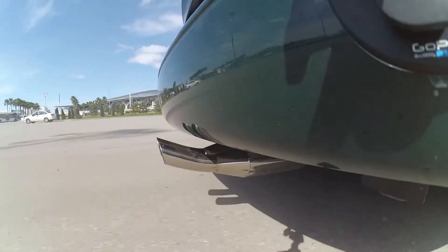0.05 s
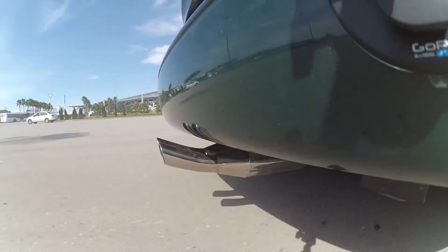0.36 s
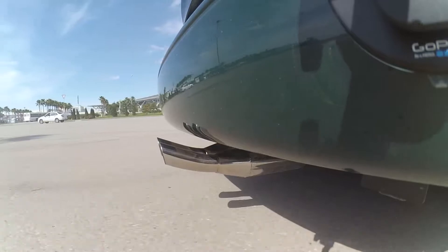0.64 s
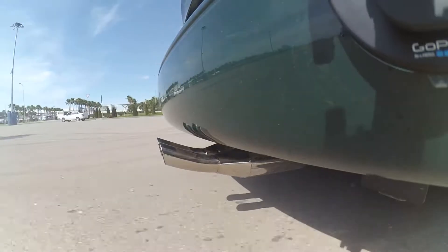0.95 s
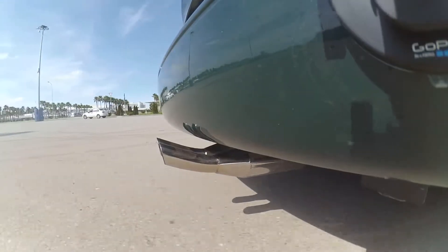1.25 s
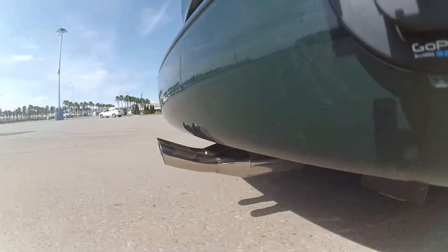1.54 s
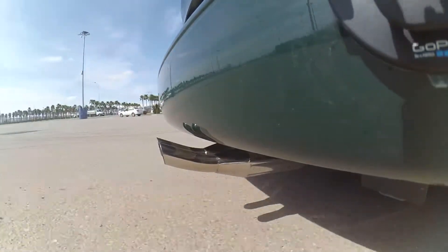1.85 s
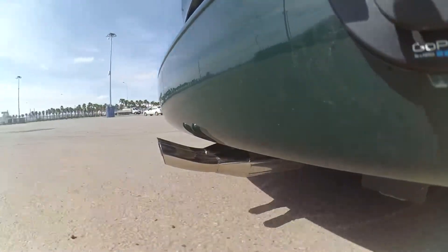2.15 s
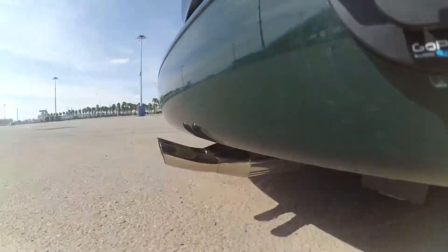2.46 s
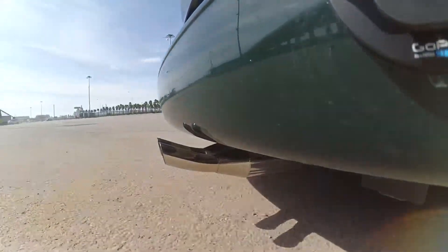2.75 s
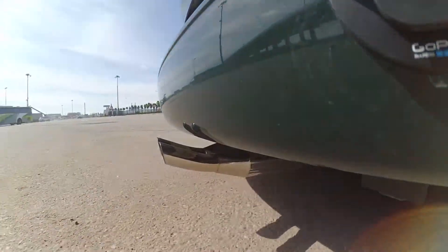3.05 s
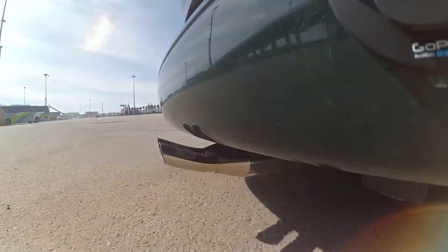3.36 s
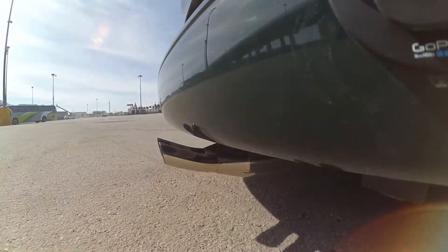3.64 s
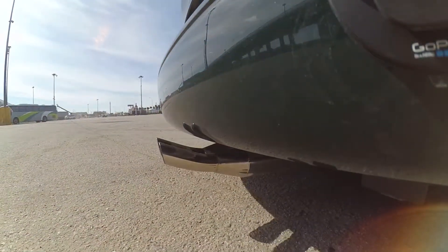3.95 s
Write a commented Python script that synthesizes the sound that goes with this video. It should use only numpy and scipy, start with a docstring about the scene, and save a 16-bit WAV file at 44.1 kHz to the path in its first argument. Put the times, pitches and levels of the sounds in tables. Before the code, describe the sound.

Heard beside the tailpipe, a car exhaust drops in pitch and settles into a steady throb. Tyres roll over gritty pavement with small stone ticks, while wind gusts thump the microphone harder later on, joined by brief, light scrubbing.

```python
"""A car coasting across a paved lot

Heard from the rear bumper, beside the tailpipe. Each engine firing makes a pressure pulse, and the
pulses slow to a low throb. The tyres roar, hiss over grit and flick small stones. Gusts buffet the
microphone, and near the end something, probably a tyre, scrubs in short judders."""
import sys
import numpy as np
from scipy import signal
from scipy.fft import rfft, irfft
from scipy.io import wavfile
from scipy.ndimage import uniform_filter1d

SR = 44100
rng = np.random.default_rng(int(sys.argv[2]) if len(sys.argv) > 2 else 0)


def wrap_up_sound(samples):
    """Save the sound to the file named by the first command line argument, as 16-bit audio."""
    columns = np.atleast_2d(samples).T
    # keep every value between -1 and 1, then stretch to whole-number steps
    tamed = np.clip(columns, -1, 1)
    steps = np.round(tamed * 32767).astype(np.int16)
    wavfile.write(sys.argv[1], SR, steps)


N = 176400
TIME = np.arange(N) / SR
BURST_AGE = np.arange(SR // 10) / SR  # seconds since a short sound began

# How fast the engine fires: (time [s], firings [1/s])
FIRING_RATE = [(0, 46.23), (.25, 42.66), (.5, 38.16), (.75, 35.18), (1, 32.75), (1.3, 31.69), (1.6, 31.47),
               (2, 30.57), (2.4, 30.15), (2.7, 29.49), (2.9, 31.04), (3.1, 31.19), (3.4, 32.3),
               (3.7, 31.72), (4, 33.37)]
# Exhaust tones at 1 to 6 times the firing rate: (time [s], tone 1 [dB], ..., tone 6 [dB])
EXHAUST_TONES = [(0, -11.5, -25.5, -23.5, -24.5, -49, -50), (.4, -16.5, -23.5, -25.5, -26.5, -37.5, -47),
                 (.75, -15.5, -20, -28.5, -35.5, -34.5, -78), (1.2, -15, -16, -30, -31, -31, -32),
                 (1.5, -14.5, -16.5, -44, -34, -33, -36.5), (2.3, -15, -17.5, -45, -36, -28.5, -32.5),
                 (2.85, -15, -18, -36, -43, -29.5, -46), (3.4, -15.5, -14.5, -38, -36, -29, -34),
                 (3.85, -14, -18, -48, -31.5, -30, -59), (4, -29, -11, -41, -17.5, -20, -38)]
# How the tyre noise rises and falls: (time [s], roar strength [dB], hiss strength [dB])
ROLLING = [(0, -35.5, -63), (.3, -40, -48.5), (.55, -40, -46.5), (.86, -43, -49), (1.06, -41, -45),
           (1.18, -45, -49), (1.7, -46, -50), (1.97, -47.5, -49), (2.25, -48, -54.5), (2.42, -46.5, -48),
           (2.55, -52, -52.5), (2.63, -49.5, -50.5), (2.87, -52.5, -52), (2.93, -51, -48.5),
           (2.98, -56, -54.5), (3.04, -49, -50.5), (3.18, -57.5, -56.5), (3.26, -55, -53.5),
           (3.48, -52, -59), (4, -49.5, -68)]
# Tone colour of the tread's roar: (frequency [Hz], relative level [dB])
ROAR_COLOUR = [(200, 5.5), (300, 11.5), (420, 1), (600, -2), (820, -5.5), (1060, 2.5), (1220, -2),
               (1400, -0.5), (1800, -6.5), (2300, -10.5), (3200, -12), (6000, -17.5), (15000, -32.5)]
# Tone colour of hiss and grit: (frequency [Hz], relative level [dB])
HISS_COLOUR = [(1000, -29), (2000, 3.5), (2650, 1.5), (3120, 3.5), (3450, -1.5), (3780, 4), (4100, 0),
               (4460, 4.5), (4800, 0), (5480, 1.5), (6300, -1), (8200, -0.5), (8900, -3), (12500, -10),
               (15500, -14.5)]
# Flicked stones: (time [s], peak [dB], low edge [Hz], high edge [Hz], fade time [s])
STONES = [(.285, -21.5, 2020, 5900, 0.0009), (.979, -30, 2500, 9400, .0012),
          (.994, -31, 2800, 11000, 0.0017), (1.035, -28.5, 1500, 4500, 0.0012),
          (1.057, -34, 6000, 10900, 0.0022), (1.076, -28, 2520, 7000, 0.003),
          (1.098, -23.5, 2850, 8650, 0.0057), (1.244, -31, 3520, 7640, 0.0063),
          (1.6015, -24.5, 1700, 4750, 0.0005), (1.6715, -22, 1380, 7000, 0.00061),
          (1.813, -33, 2500, 14000, .0003), (1.866, -21.5, 3670, 9300, 0.0035),
          (2.101, -24.5, 2200, 6400, 0.001), (2.422, -29, 2450, 7600, 0.0014),
          (2.598, -25.5, 1080, 5460, 0.0039), (3.08, -25.5, 2000, 8700, 0.00031),
          (3.245, -34.5, 3000, 13000, .0004)]
# Constant buffeting by the wind: (time [s], level [dB])
BUFFETING = [(0, -34.5), (.7, -26), (1.1, -21.5), (1.4, -20.5), (1.8, -25.5), (2.25, -33), (2.5, -21),
             (2.9, -17.5), (3.3, -18), (3.65, -16), (4, -21.5)]
# Tone colour of the buffeting: (frequency [Hz], relative level [dB])
BUFFET_COLOUR = [(30, -4.5), (60, -2), (110, -3.5), (180, -9), (235, -19), (480, -34), (900, -46.5),
                 (2500, -69.5)]
# Gusts on the microphone: (time [s], length [s], level [dB], high edge [Hz])
GUSTS = [(0.77, 0.057, -32.5, 423), (0.916, 0.08, -34.5, 423), (1.117, 0.15, -37, 417),
         (1.295, 0.23, -27.5, 360), (2.375, 0.065, -36.5, 385), (2.643, 0.13, -33.5, 444),
         (2.814, 0.16, -29.5, 398), (3.037, 0.092, -31.5, 324), (3.245, 0.24, -33, 435),
         (3.66, 0.063, -33.5, 430), (3.884, 0.12, -34, 460), (3.967, .06, -22.5, 630)]
# Single swirls of air hitting the microphone: (time [s], strength [dB], high edge [Hz])
SLAPS = [(0.913, -15.5, 400), (1.178, -17, 505), (1.338, -16.5, 600), (1.35, -13, 660), (1.383, -17.5, 850),
         (1.408, -15.5, 560), (1.424, -12.5, 780), (2.528, -14.5, 388), (2.662, -12.5, 845),
         (2.673, -18, 940), (2.705, -20, 650), (2.827, -11, 402), (2.848, -6.5, 445), (2.866, -11.5, 500),
         (2.91, -13.5, 784), (2.939, -19.5, 640), (3.036, -10.5, 378), (3.128, -13.5, 510),
         (3.145, -12, 487), (3.267, -17.5, 880), (3.326, -14, 570), (3.338, -14, 413), (3.378, -25, 600),
         (3.421, -17.5, 663), (3.445, -18.5, 780), (3.49, -18.5, 700), (3.503, -16, 493),
         (3.789, -16.5, 500), (3.889, -18, 560), (3.925, -11, 563), (3.937, -12, 775), (3.957, -12, 840),
         (3.979, -15, 667)]
# Bursts of scrubbing: (time [s], length [s], strength [dB], treble change [dB])
JUDDERS = [(3.504, 0.02, -52.5, 1), (3.548, 0.021, -53, -6), (3.583, 0.022, -50, -5),
           (3.617, 0.017, -51, -8), (3.644, 0.015, -46.5, -5), (3.668, 0.02, -50, -3),
           (3.688, 0.024, -47.5, -5), (3.715, 0.014, -47, 0), (3.736, 0.015, -48.5, 3),
           (3.761, 0.016, -46, 0), (3.794, 0.02, -50.5, 1), (3.851, 0.013, -50, 8), (3.898, 0.02, -49, 6),
           (3.925, 0.051, -46, -4)]
# Pitches at which the scrubbing rings: (frequency [Hz], width [Hz], relative level [dB])
SCRUB_RINGS = [(1930, 320, 0), (2750, 760, -7), (4300, 180, -2), (4620, 330, -3), (5540, 370, 2.5),
               (6320, 460, 1), (7300, 1100, -1), (8230, 130, -1.5), (10600, 1800, 0), (12900, 1500, -3.5)]


def exhaust(first_firing_s=0.02006, jitter_s=0.000085, burble_db=-31):
    """Each firing makes a slightly uneven dip in pressure; uneven burning adds a burble."""
    rate, = in_time(FIRING_RATE)
    firings = np.cumsum(rate) / SR - rate[0] * first_firing_s  # running count
    firings += rate * jitter_s * drift(10.4)
    faint_tones = [-58.5 - 2 * k + 2 * drift(30) for k in range(8)]  # tones 7 to 14, in dB
    levels = in_time(EXHAUST_TONES) + faint_tones
    pulses = -sum(from_db(db) * np.cos(2 * np.pi * (k + 1) * firings) for k, db in enumerate(levels))
    rumble = band(noise(), 23, 63, order=3)
    burble = from_db(burble_db) * unit_level(rumble * np.sin(np.pi * firings) ** 2)
    burble *= (rate / rate.max()) ** 4  # dies away as the engine slows
    wobble = from_db(drift(22.6))  # about 1 dB
    return np.sqrt(2) * pulses * wobble + burble


def tailpipe(x, ring_hz=190.7, width_hz=66):
    """Each firing rings briefly in the pipe: tones near its pitch come out later, but no louder."""
    poles = resonance(ring_hz, width_hz)
    return signal.lfilter(poles[::-1], poles, x)


def tyres(roar_trim_db=3.5, hiss_trim_db=-0.73, flicker_db=2.3, treble_hz=9500):
    """The rolling tread roars, with a fine hiss and crackling grit."""
    roar_db, hiss_db = in_time(ROLLING)
    roar = colour(noise(), ROAR_COLOUR) * from_db(roar_db + roar_trim_db + drift(35))
    hiss = colour(noise(), HISS_COLOUR) * from_db(hiss_trim_db + flicker_db * drift(25))
    bright = hiss + grit(hiss_db)
    lower = one_side(bright, treble_hz, "low")
    # The top treble is turned down where the hiss is quiet.
    treble_gain = from_db(0.54 * np.minimum(hiss_db + 46.5, 0))
    return roar + (lower + treble_gain * (bright - lower)) * from_db(hiss_db)


def grit(hiss_db, typical_grains_per_s=170, fade_s=0.00021, relative_db=-4):
    """Crushed grains make tiny clicks, more often where the hiss is loud."""
    chance = typical_grains_per_s / SR * from_db(0.61 * (hiss_db - hiss_db.mean()))
    hits = rng.random(N) < chance
    size_db = np.minimum(4.5 * rng.exponential(1, N), 14)  # many small grains, few big ones
    fades = signal.lfilter([1], [1, -np.exp(-1 / (fade_s * SR))], hits * from_db(size_db) + 1e-18)
    return colour(fades * noise(), HISS_COLOUR) * from_db(relative_db)


def stones(rise_s=0.0001, tail_db=-26, tail_s=0.018):
    """Each stone flicked by the tread gives a dry tick and a faint tail under the car."""
    out = np.zeros(N)
    for start, db, low_hz, high_hz, fade_s in STONES:
        shape = strike(rise_s, fade_s) + from_db(tail_db) * strike(rise_s, tail_s)
        add(out, start, from_db(db) * burst(shape, low_hz, high_hz, order=3))
    return out


def wind(lumps_db=4, swirl_db=9.5, swirls_per_s=137, edge_s=0.011, steady_s=0.031):
    """Air pushes on the microphone: lumpy buffeting, a deep swell and gusts full of quick swirls."""
    buffet_db, = in_time(BUFFETING)
    lumpy = noise() * from_db(lumps_db * drift(33))
    out = from_db(buffet_db) * colour(lumpy, BUFFET_COLOUR)
    swell = unit_level(band(noise(), 13.8, 46))
    out += from_db(-22.5 + 0.17 * buffet_db) * swell  # loosely follows the buffeting
    swirls = from_db(swirl_db * np.tanh(drift(swirls_per_s)))
    for start, length, db, high_hz in GUSTS:
        air = band(noise(), 181, high_hz)
        air = band(air, 50, high_hz, order=1) * swirls
        power = uniform_filter1d(air ** 2, size=int(steady_s * SR))
        air /= np.sqrt(power + 1e-12)  # the gust holds its strength
        out += from_db(db) * air * envelope(start - edge_s / 2, edge_s, length - edge_s, edge_s)
    return out


def wind_slaps(rise_s=0.00084, fade_s=0.0024):
    """The strongest swirls of air hit the microphone as separate dull slaps."""
    out = np.zeros(N)
    for start, db, high_hz in SLAPS:
        slap = burst(strike(rise_s, fade_s), 169, high_hz)
        softened = band(slap, 50, 0.78 * high_hz, order=1)
        add(out, start, from_db(db) * softened)
    return out


def scrub(slips_per_s=500, slip_db=2.5, rise_s=0.0038, fade_s=0.0084):
    """A rubbing surface catches and slips in ringing, hissing judders, with one lower rasp."""
    rasp = from_db(-43) * unit_level(band(noise(), 1230, 1900))
    out = rasp * envelope(start=3.806, rise_s=0.011, hold_s=0, fade_s=0.0069)
    hiss = from_db(-4) * colour(noise(), HISS_COLOUR)
    slips = unit_level(from_db(slip_db * np.tanh(drift(slips_per_s))))
    for start, length, db, treble_db in JUDDERS:
        span = slice(int(start * SR), int(start * SR) + len(BURST_AGE))
        ringing = scrub_ring()[:len(hiss[span])]
        rubbing = (ringing + hiss[span]) * slips[span]
        rubbing += (from_db(treble_db) - 1) * one_side(rubbing, 8500, "high")
        shape = envelope(start, rise_s, length - rise_s, fade_s)
        out[span] += from_db(db) * rubbing * shape[span]
    return out


def scrub_ring(detune=0.015):
    """Rubbing rings at several high pitches. They shift each time, the highest ones most."""
    ringing = 0
    top_hz = SCRUB_RINGS[-1][0]
    for hz, width_hz, db in SCRUB_RINGS:
        hz *= 1 + detune * hz / top_hz * rng.standard_normal()
        ring_filter = [1, 0, -1] + resonance(hz, width_hz)
        ring = signal.sosfilt([ring_filter, ring_filter], noise(len(BURST_AGE)))
        ringing += from_db(db) * unit_level(ring)
    return unit_level(ringing)


def from_db(db):
    """Turn decibels into a number to multiply by."""
    return 10 ** (np.asarray(db) / 20)


def unit_level(x):
    """Scale a sound to an average (RMS) level of one."""
    return x / np.sqrt(np.mean(x ** 2) + 1e-20)


def noise(samples=N):
    """Plain white noise."""
    return rng.standard_normal(samples)


def in_time(rows):
    """Join a table's points with straight lines: one curve for each column after the time."""
    times, *columns = np.transpose(rows)
    return [np.interp(TIME, times, column) for column in columns]


def band(x, low_hz, high_hz, order=2):
    """Keep what lies between two frequencies; a higher order cuts more sharply."""
    edges = [low_hz, np.clip(high_hz, low_hz + 10, SR / 2 - 100)]
    return signal.sosfilt(signal.butter(order, edges, "band", fs=SR, output="sos"), x)


def one_side(x, hz, side):
    """Keep the "low" or "high" side of a frequency, without delaying the sound."""
    return signal.sosfiltfilt(signal.butter(2, hz, side, fs=SR, output="sos"), x)


def resonance(hz, width_hz):
    """Feedback numbers (poles) that make a filter ring; narrower rings longer."""
    r = np.exp(-np.pi * width_hz / SR)
    return [1, -2 * r * np.cos(2 * np.pi * hz / SR), r * r]


def colour(x, spectrum):
    """Give a sound a table's tone colour, at a level of one."""
    hz, db = np.transpose(spectrum)
    bins = np.arange(N // 2 + 1) * SR / N + 1e-3
    gain = from_db(np.interp(np.log(bins), np.log(hz), db)) * (bins > 10)
    return unit_level(irfft(rfft(x) * gain, N))


def drift(rate):
    """Smooth random wandering, about one in size; a higher rate wanders faster."""
    r = np.exp(-80 * np.pi * rate / SR)
    slow = signal.lfilter([1], [1, -2 * r, r * r], noise(N // 40 + 2002))[2000:]
    return np.interp(np.arange(N) / 40, np.arange(len(slow)), unit_level(slow))


def envelope(start, rise_s, hold_s, fade_s, time=TIME):
    """A loudness shape: rise in a straight line, hold, then die away."""
    age = time - start
    return np.clip(age / rise_s, 0, 1) * np.exp(-np.clip((age - rise_s - hold_s) / fade_s, 0, 20))


def strike(rise_s, fade_s):
    """The loudness shape of a short hit, with no hold."""
    return envelope(0, rise_s, 0, fade_s, BURST_AGE)


def burst(shape, low_hz, high_hz, order=2):
    """A short puff of noise between two frequencies, with a peak of one."""
    puff = noise(len(shape)) * shape
    even = irfft(np.exp(1j * np.angle(rfft(puff))), len(shape))  # all frequencies equally strong
    puff = band(even * np.minimum(10 * shape, 1), low_hz, high_hz, order=order)
    return puff / np.max(np.abs(puff) + 1e-12)


def add(out, start, sound):
    """Mix a short sound in at its start time."""
    i = max(int(start * SR), 0)
    piece = out[i:i + len(sound)]
    piece += sound[:len(piece)]


def scene():
    """Everything meets at one microphone on the bumper."""
    return (tailpipe(exhaust()) + tyres() + stones() + wind() + wind_slaps() + scrub())[None]


def record(dry):
    """Cut the treble above 15400 Hz."""
    return signal.sosfilt(signal.ellip(10, .1, 80, 15400, fs=SR, output="sos"), dry)


dry = scene()
out = record(dry)
wrap_up_sound(out)
```